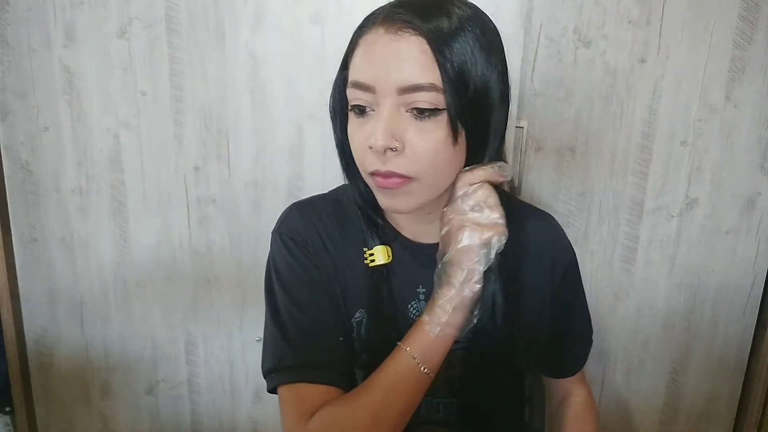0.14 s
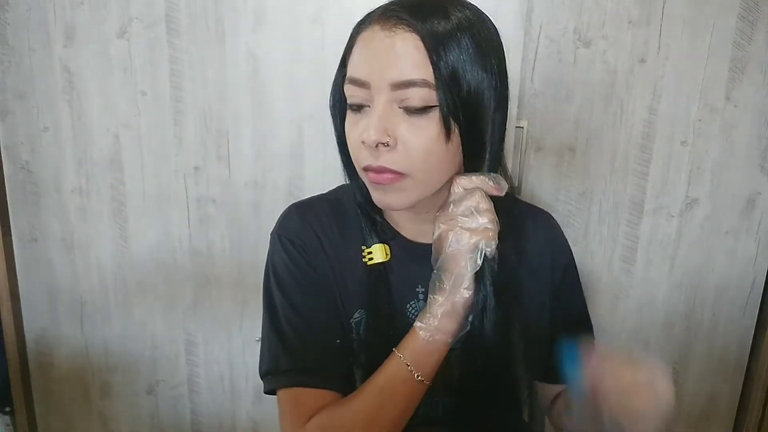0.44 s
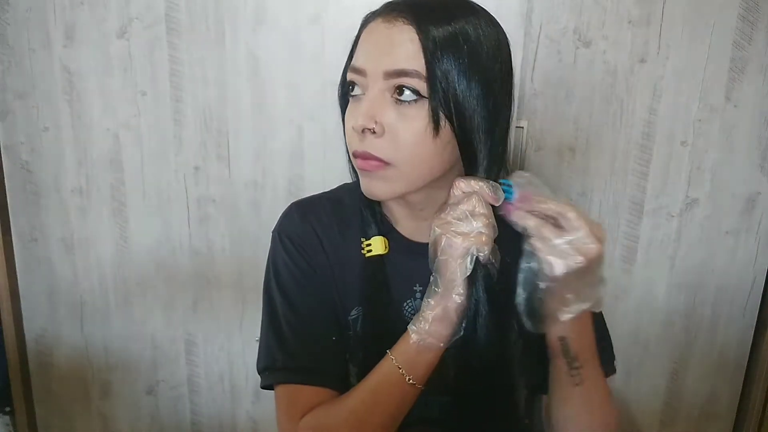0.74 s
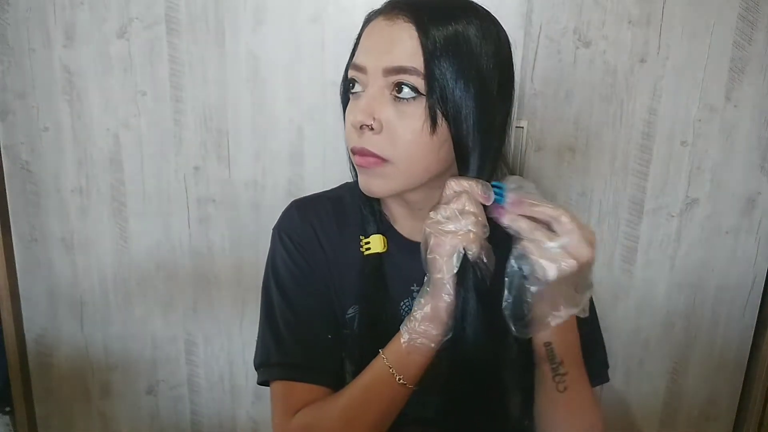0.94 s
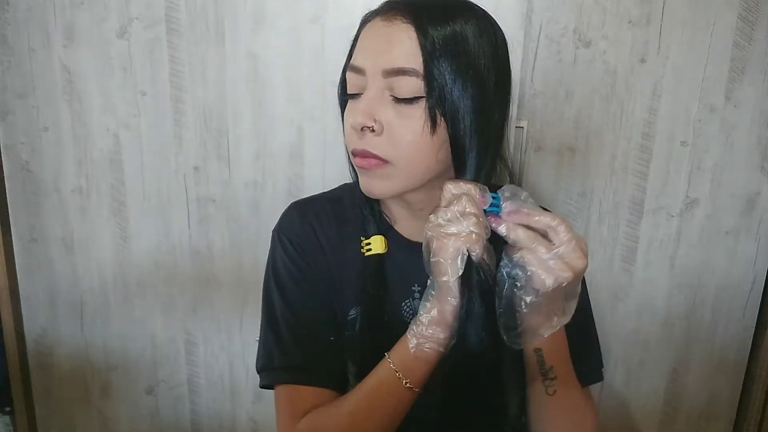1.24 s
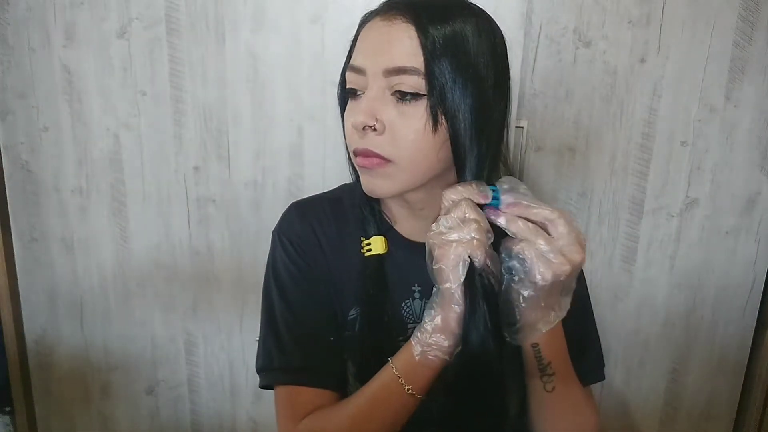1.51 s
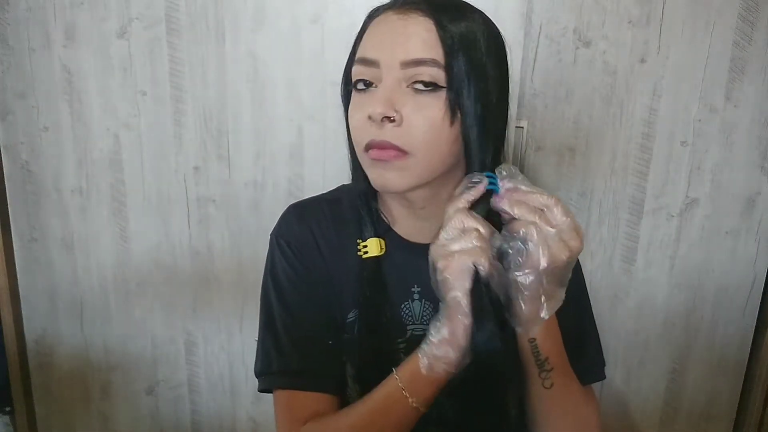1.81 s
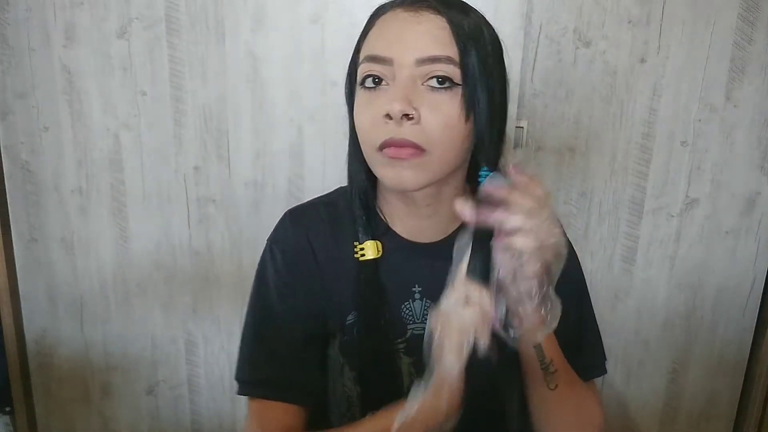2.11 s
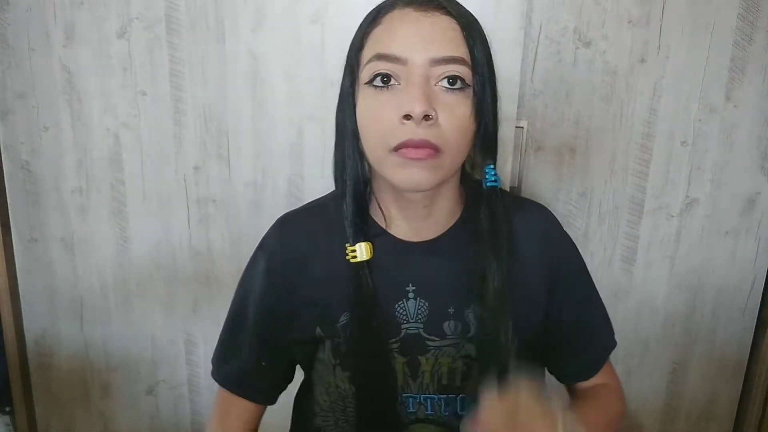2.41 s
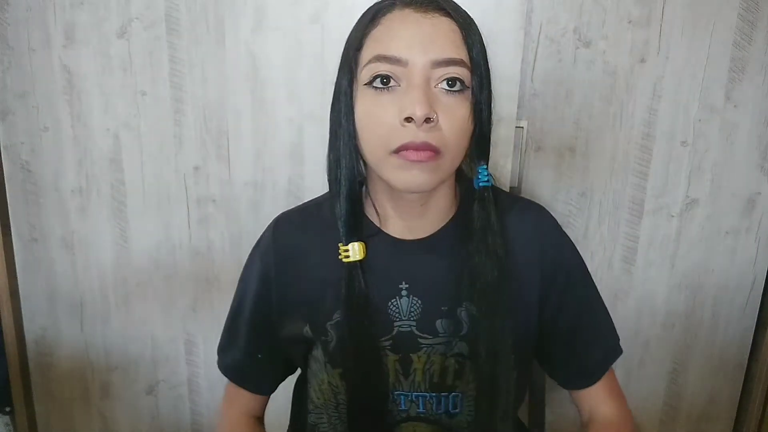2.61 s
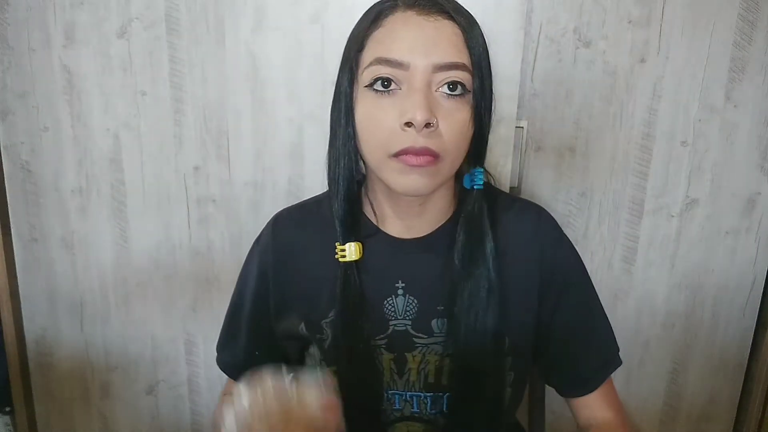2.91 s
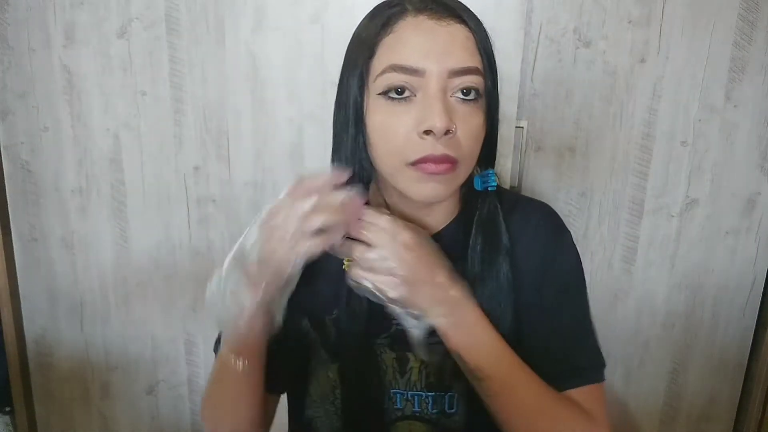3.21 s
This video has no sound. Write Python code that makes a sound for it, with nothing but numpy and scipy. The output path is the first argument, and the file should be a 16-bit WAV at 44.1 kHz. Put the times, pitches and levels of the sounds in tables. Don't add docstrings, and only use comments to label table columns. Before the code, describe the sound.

Thin plastic gloves crinkle close to the microphone, crisp and hissy with lower rustles. Rapid crunches run from 0.1 to 0.7 s, lighter sparse crackles follow until 1.1, then irregular bursts build to the fullest rustling at 1.9-2.3. A crunch at 2.6, softer rustling and movement after 3. Faint sleeve brushes, tiny far squeaks, low rumble, slowly rising motor hum and thin high whine sit behind in a small room.

```python
import sys
import numpy as np
from scipy import signal
from scipy.fft import rfft, irfft, next_fast_len
from scipy.io import wavfile
from scipy.ndimage import uniform_filter1d, map_coordinates

SR = 44100
rng = np.random.default_rng(int(sys.argv[2]) if len(sys.argv) > 2 else 0)


def gain_from_decibels(decibels):
    exponent = np.asarray(decibels, float) / 20
    return 10 ** exponent


def wav_out(sig):
    wavfile.write(sys.argv[1], SR, np.round(np.clip(np.atleast_2d(sig).T, -1, 1) * 32767).astype(np.int16))


N = 147735

# [f/Hz, level/dB per Hz]
CREASE_SPECTRUM = [(1200, -55), (2500, -32), (3100, -14), (3800, -6), (5000, -4), (7000, -2.5), (9300, 0),
                   (15700, -5.5)]


def unit(x):
    return x / np.sqrt(np.mean(x ** 2) + 1e-20)


def along(points, hz):
    f, v = np.transpose(points)
    return np.interp(np.log(hz + 1), np.log(f + 1), v)


def wobble(rate):
    return map_coordinates(rng.standard_normal(400), [np.arange(N) * rate / SR])


def swell(t, start, length):
    return np.sin(np.pi * np.clip((t - start) / length, 0, 1))


def filtered(x, response):
    m = next_fast_len(N + SR // 2)
    return irfft(rfft(x, m) * response(np.fft.rfftfreq(m, 1 / SR)), m)[..., :N]


def patchy(x, depth_db):
    z = signal.stft(x, nperseg=256)[2]
    field = uniform_filter1d(rng.standard_normal(z.shape), size=7, axis=0)
    field = uniform_filter1d(field, size=9, axis=1)
    return signal.istft(z * gain_from_decibels(depth_db * unit(field)), nperseg=256)[1][:N]


def hand_effort(stir_db):
    # [t/s, peak level/dB, rise/s, release/s]
    crunches = [(0.116, -24, 0.0079, 0.057), (.24, -22.5, 0.017, 0.019), (.35, -25.5, 0.0093, 0.042),
                (.455, -29.5, 0.0054, 0.02), (.565, -27.5, 0.022, 0.03), (.64, -28.5, 0.015, 0.0092),
                (.95, -31.5, 0.0037, 0.0058), (0.977, -32, .005, 0.01), (1.045, -42, .004, 0.0069),
                (1.072, -26, .001, 0.0019), (1.118, -20.5, 0.021, 0.027), (1.137, -22, 0.0094, 0.016),
                (1.285, -26.5, 0.0042, 0.0056), (1.345, -28.5, .012, 0.0059), (1.462, -33, .004, .008),
                (1.474, -30.5, 0.011, 0.03), (1.59, -28, 0.011, 0.0098), (1.755, -26.5, 0.02, 0.035),
                (1.876, -19.5, .006, 0.033), (2.052, -19.5, 0.0066, .012), (2.07, -21.5, .012, 0.049),
                (2.2, -22.5, 0.013, 0.016), (2.23, -29, 0.0076, 0.017), (2.624, -19.5, 0.018, 0.055),
                (2.695, -25, 0.0052, .03), (3.05, -37, 0.023, 0.064), (3.115, -29.5, 0.031, 0.019),
                (3.312, -26.5, 0.09, 0.025)]
    crunch_db = -16
    t = np.arange(N) / SR
    power = gain_from_decibels(stir_db + 0.6 * wobble(11)) ** 2
    for at, db, rise, release in crunches:
        attack = np.sin(np.pi / 2 * np.clip((t - at) / rise, 0, 1)) ** 2
        decay = np.exp(-np.clip(t - at - rise, 0, None) / release)
        power = power + gain_from_decibels(db + crunch_db) ** 2 * attack * decay
    return 10 * np.log10(power)


def buckles(spectrum, per_s):
    spread_db = 2
    rate = per_s / SR * gain_from_decibels(3 * wobble(60))
    struck = rng.random(N) < rate
    size = gain_from_decibels(spread_db * np.minimum(rng.exponential(size=N), 2))
    clicks = unit(struck * size * np.clip(rng.standard_normal(N), -2, 2))
    hiss = rng.standard_normal(N)
    return unit(filtered(patchy(clicks + hiss, depth_db=1.22), lambda hz: gain_from_decibels(along(spectrum, hz))))


def fine_creases(effort_db, middle_db, sheen_db):
    middle_hz, sheen_hz = 7100, 10200
    creases = gain_from_decibels(effort_db) * buckles(CREASE_SPECTRUM, per_s=8000)
    finest = filtered(creases, lambda hz: 1 / (1 + (sheen_hz / (hz + 1)) ** 8))
    middle = filtered(creases, lambda hz: 1 / (1 + (hz / middle_hz) ** 6))
    return creases + finest * (gain_from_decibels(sheen_db) - 1) + middle * (gain_from_decibels(middle_db) - 1)


def broad_folds(effort_db, dull_db):
    # [f/Hz, level/dB per Hz]
    fold_spectrum = [(500, -18), (1100, -16.5), (1500, -10.5), (1900, -4), (2400, -3.5), (3100, 1),
                     (4000, -0.5), (6000, -29)]
    fold_db, growth = -17.5, 1.01
    mean_db = effort_db.mean()
    level_db = mean_db + fold_db + growth * (effort_db - mean_db) + dull_db
    return gain_from_decibels(level_db + wobble(8.83)) * buckles(fold_spectrum, per_s=3600)


def popping_creases():
    # [t/s, peak level/dB]
    snaps = [(.1216, -25), (.1954, -28), (.2604, -27), (.4584, -28), (.4634, -28), (.9814, -36),
             (1.202, -33), (1.3574, -31), (1.8806, -25), (2.8754, -26)]
    pops = np.zeros(N)
    for at, db in snaps:
        pops[round(at * SR)] = gain_from_decibels(db + 1)
    return filtered(pops, lambda hz: gain_from_decibels(along(CREASE_SPECTRUM, hz)))


def gloves():
    # [t/s, level/dB, broad folds/dB, middle creases/dB, finest creases/dB],
    # the last three over the level
    hands = [(0, -43, -7, -2, -1), (.11, -40, -6.5, -3.5, -3.5), (.17, -39.5, -0.5, -1, -3),
             (.52, -45, -1, -1, 0.5), (.6, -44.5, 3, 2.5, 2), (.81, -48, 5, 2.5, 5),
             (.87, -47.5, -3, -5, -1), (1.11, -49, -4, -6, 1), (1.19, -44, 3.5, -4, -2.5),
             (1.43, -48.5, -0.5, 3, 2), (1.68, -43, 3, 2, 5), (1.82, -42.5, 6, 3.5, 4.5),
             (2.2, -34.5, 5.5, -0.5, 0.5), (2.58, -45, 13, 9, 10), (2.8, -39.5, -1.5, -3.5, -8),
             (3.03, -44, -4, 2, 1.5), (3.141, -38, 6, 2.5, 4), (3.3, -43.5, 7.5, 2, 3)]
    t = np.arange(N) / SR
    s, *columns = np.transpose(hands)
    stir_db, dull_db, middle_db, sheen_db = [np.interp(t, s, c) for c in columns]
    effort_db = hand_effort(stir_db)
    creases = fine_creases(effort_db, middle_db, sheen_db)
    return creases + popping_creases() + broad_folds(effort_db, dull_db)


def sleeves():
    # [t/s, length/s, centre f/Hz, level/dB]
    swishes = [(-.05, 0.37, 730, -72), (1.1, 0.076, 750, -70.5), (.57, .16, 2000, -66),
               (.13, .3, 2100, -68), (1.13, .05, 2700, -62), (1.18, .14, 1600, -72), (2.05, .2, 800, -91),
               (2.6, 0.15, 450, -75), (3.014, .3, 590, -71.5), (1.406, 0.3, 75, -69),
               (3.21, 0.076, 81, -54.5)]
    t, noise = np.arange(N) / SR, rng.standard_normal(N)
    out = np.zeros(N)
    for start, length, centre, db in swishes:
        band = filtered(noise, lambda hz: np.exp(-(np.log((hz + 1) / centre) / 0.22) ** 2))
        out += gain_from_decibels(db) * swell(t, start, length) * unit(band)
    return out


def walls(x):
    # [f/Hz, time to fall 60 dB/s]
    reverb = [(500, 0.16), (4000, 0.21), (12000, 0.18)]
    step, delay = 4096, 150
    out = np.zeros(N + 2 * SR)
    for a in range(-step, N, step):
        start = max(a, 0)
        hz, t, z = signal.stft(rng.standard_normal(SR // 4), SR, nperseg=256)
        fade = gain_from_decibels(-60 * t / along(reverb, hz)[:, None])
        tail = signal.istft(z * fade, SR, nperseg=256)[1]
        window = np.hanning(2 * step)[max(-a, 0):][:N - start if a >= 0 else N - a]
        part = x[start:a + 2 * step] * window[:N - start]
        echo = signal.fftconvolve(part, tail / np.linalg.norm(tail))
        out[start + delay:][:len(echo)] += echo
    return out[:N]


def far_motor():
    # [f/Hz, level/dB]
    harmonics = [(80.5, -67), (160.5, -77.5), (241, -77), (320, -82.5), (399, -83), (474, -86.5)]
    waver_db, swell_db = 2.5, 8
    t = np.arange(N) / SR
    drift = np.cumsum(1 + 0.0028 * wobble(2.68)) / SR
    hum = np.zeros(N)
    for hz, db in harmonics:
        hum += gain_from_decibels(db + waver_db * wobble(3.88)) * np.sin(2 * np.pi * hz * drift)
    return hum * gain_from_decibels(swell_db * (t / t[-1] - 1.0))


def far_squeaks():
    # [t/s, length/s, f/Hz, level/dB]
    squeaks = [
        (.035, .115, 851, -70),
        (1.185, .055, 1135, -71),
        (1.3, .06, 1110, -73),
    ]
    t = np.arange(N) / SR
    out = np.zeros(N)
    for start, length, hz, db in squeaks:
        level = gain_from_decibels(db) * swell(t, start, length) * gain_from_decibels(wobble(41.4))
        out += level * np.sin(2 * np.pi * hz * t + 0.57 * wobble(37))
    return out


def camera_whine():
    phase = 2 * np.pi * np.cumsum(15661 + 3 * wobble(6.6)) / SR
    return gain_from_decibels(-61 + 1.5 * wobble(8.7)) * np.sin(phase)


def room_rumble():
    # [f/Hz, level/dB per Hz]
    air_spectrum = [(25, -17), (50, -12.5), (100, 1.5), (150, -5), (210, -15), (500, -17), (1100, -19.5),
                    (3000, -37.5)]
    air = filtered(rng.standard_normal(N), lambda hz: gain_from_decibels(along(air_spectrum, hz)))
    return unit(air) * gain_from_decibels(-63.5 + wobble(8.15))


def background():
    tones = far_motor() + far_squeaks() + camera_whine()
    return room_rumble() + np.sqrt(2) * tones


def housing(hz):
    # [f/Hz, width/Hz, gain/dB]
    resonances = [(1820, 330, 2.5), (4640, 760, 2), (8900, 330, 2), (10440, 450, -3.5), (12070, 730, 1)]
    return gain_from_decibels(sum(db * np.exp(-((hz - c) / w) ** 2) for c, w, db in resonances))


def port_difference(hz):
    # [f/Hz, width/Hz, level/dB]
    uneven = [(1890, 660, -9.5), (9500, 470, -7)]
    total = 0
    for k, (c, w, db) in enumerate(uneven):
        band = 1j * hz * w / (c * c - hz * hz + 1j * hz * w)
        total = total + (-1) ** k * gain_from_decibels(db) * band ** 2
    return total


def scene():
    room_db, scatter_db = -10, -6
    stray_db = -32.5
    film = gloves()
    back = background() + sleeves()
    mid = filtered(film + gain_from_decibels(room_db) * walls(film), housing) + back
    scattered = filtered(walls(film + back), housing)
    side = filtered(mid + gain_from_decibels(scatter_db) * scattered, port_difference)
    side = side + gain_from_decibels(stray_db) * patchy(scattered, depth_db=5.5)
    return np.array([mid + side, mid - side])


def roll_off(x):
    return signal.sosfilt(signal.butter(12, 17110, fs=SR, output="sos"), x)


def record(dry):
    mix = filtered(dry, lambda hz: hz < 15730)
    return roll_off(mix)


dry = scene()
out = record(dry)
wav_out(out)
```